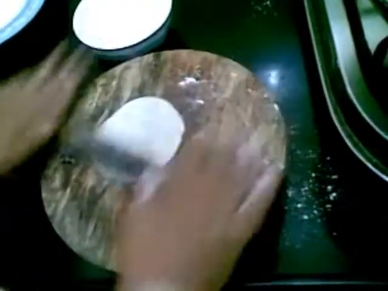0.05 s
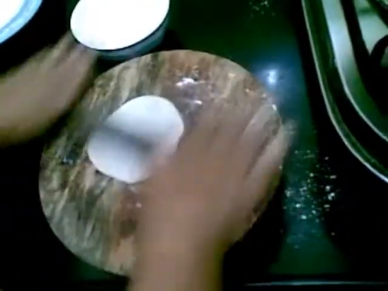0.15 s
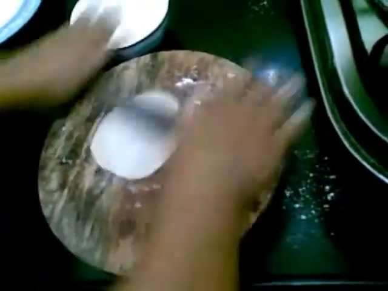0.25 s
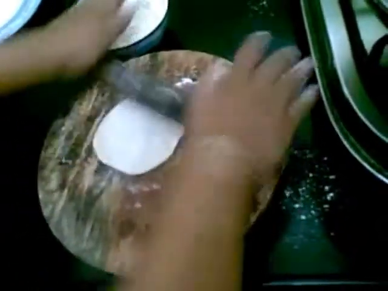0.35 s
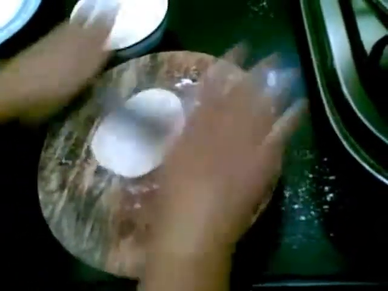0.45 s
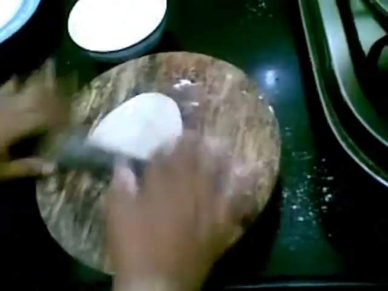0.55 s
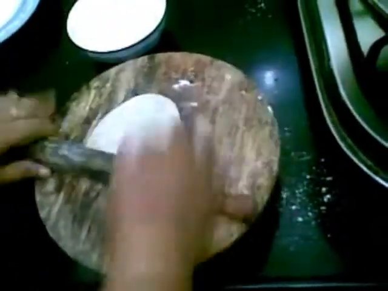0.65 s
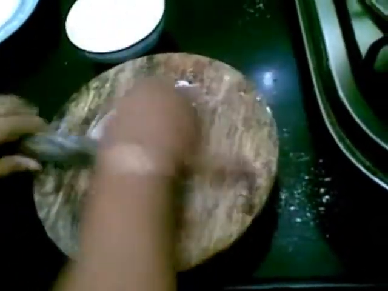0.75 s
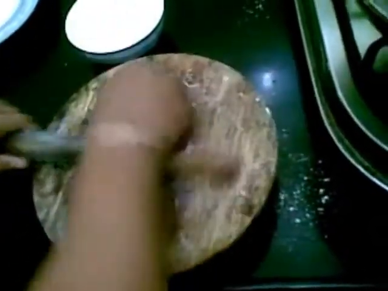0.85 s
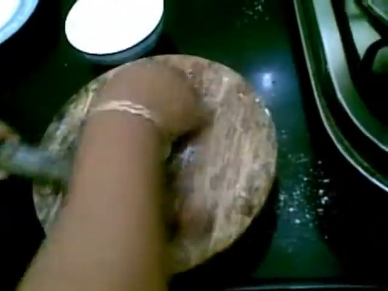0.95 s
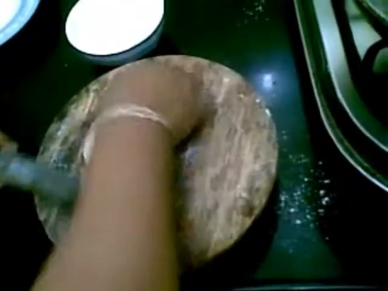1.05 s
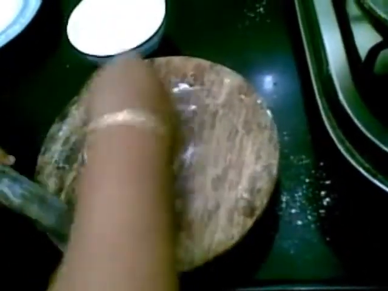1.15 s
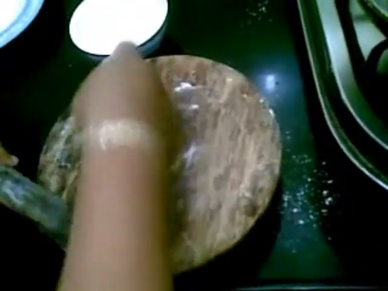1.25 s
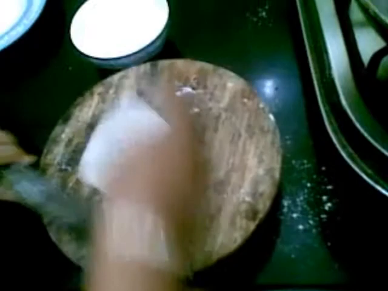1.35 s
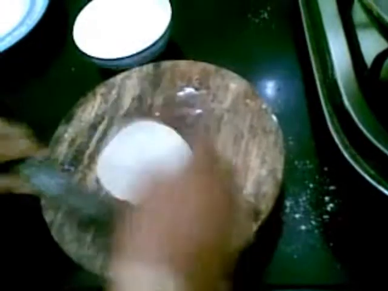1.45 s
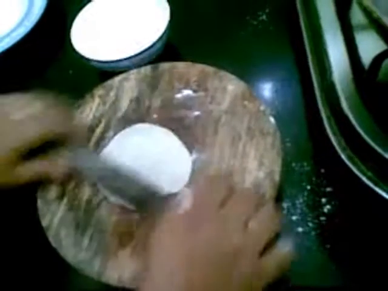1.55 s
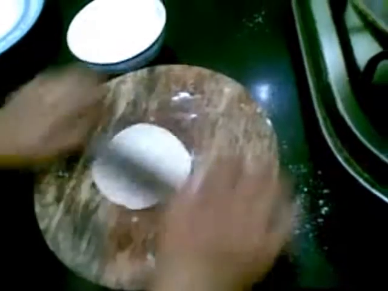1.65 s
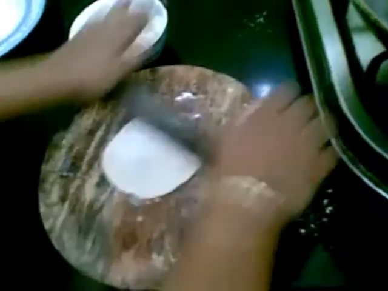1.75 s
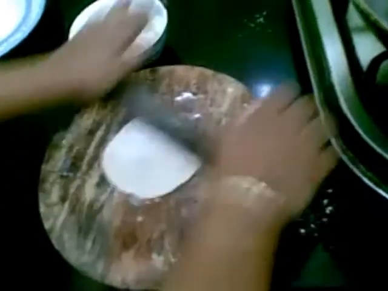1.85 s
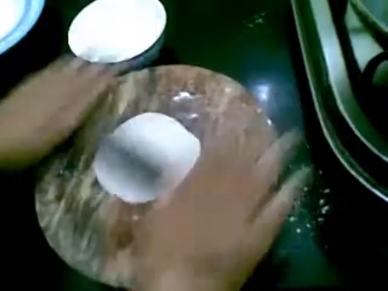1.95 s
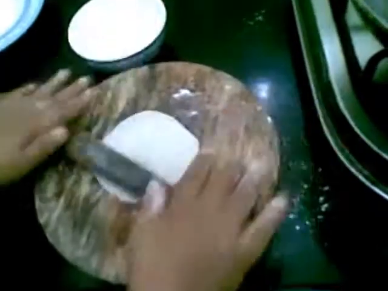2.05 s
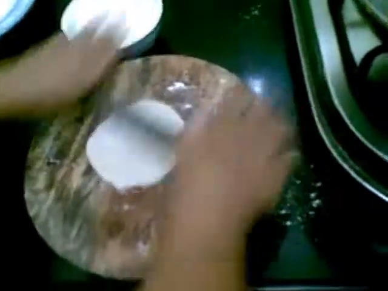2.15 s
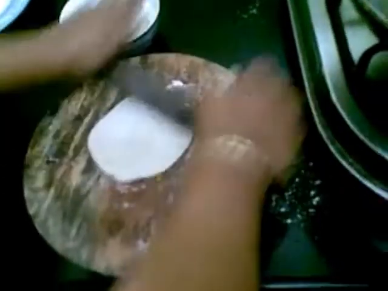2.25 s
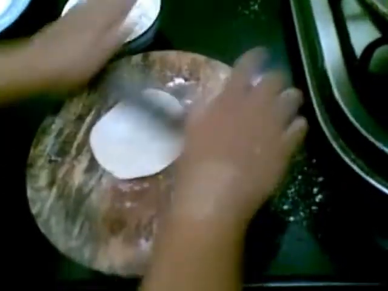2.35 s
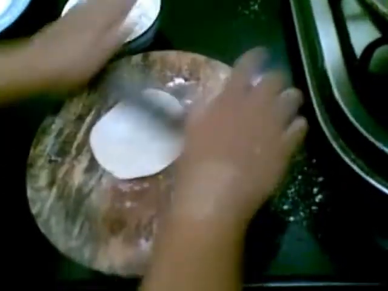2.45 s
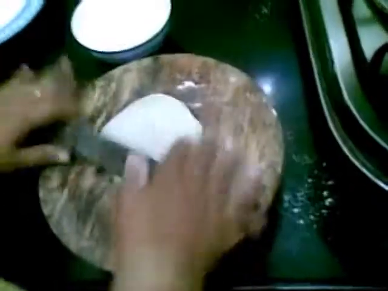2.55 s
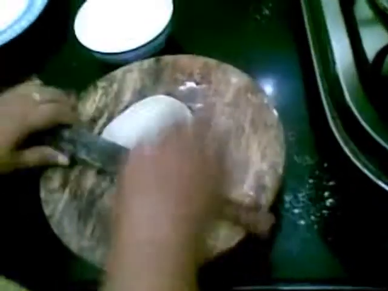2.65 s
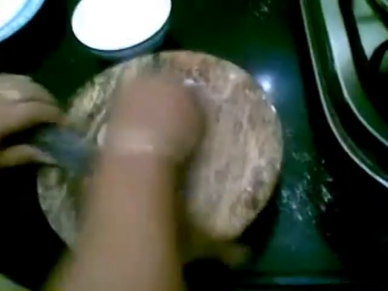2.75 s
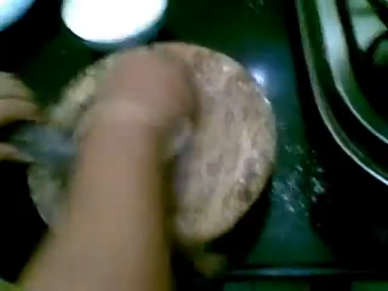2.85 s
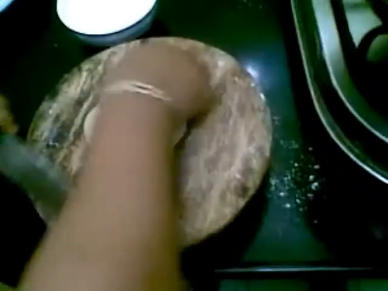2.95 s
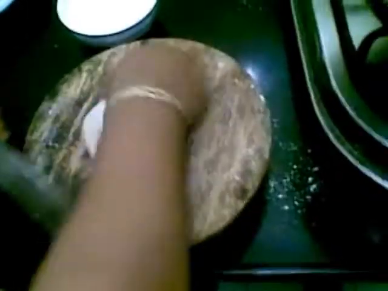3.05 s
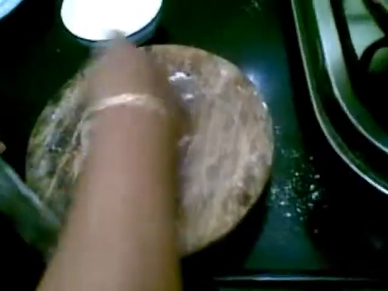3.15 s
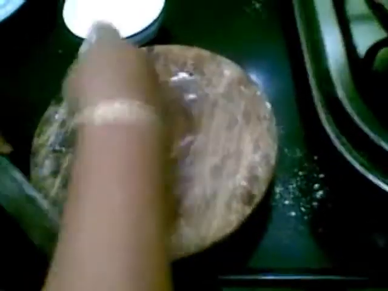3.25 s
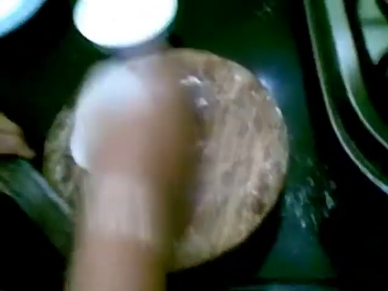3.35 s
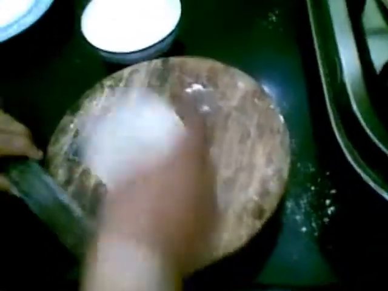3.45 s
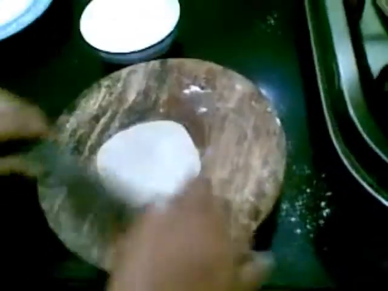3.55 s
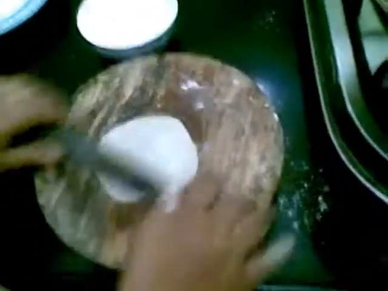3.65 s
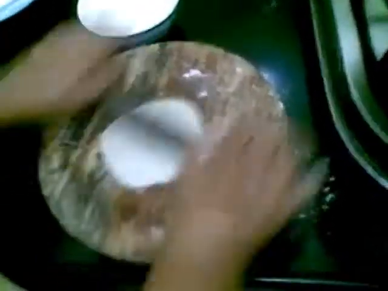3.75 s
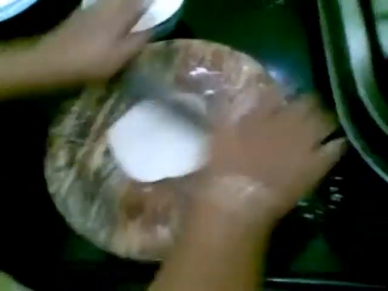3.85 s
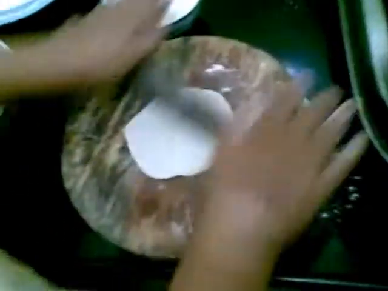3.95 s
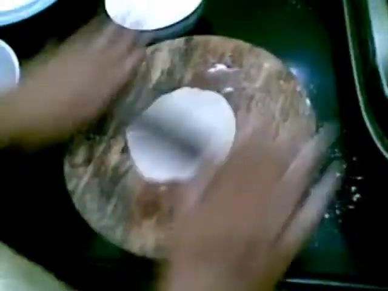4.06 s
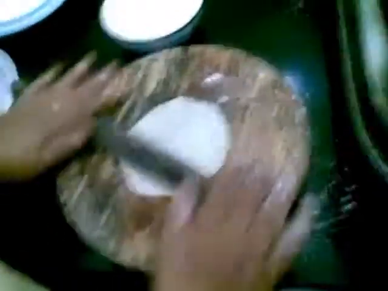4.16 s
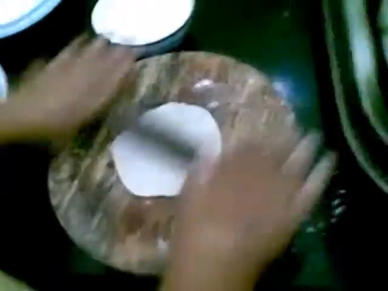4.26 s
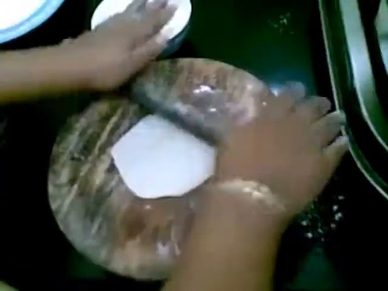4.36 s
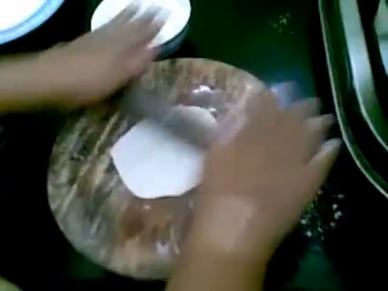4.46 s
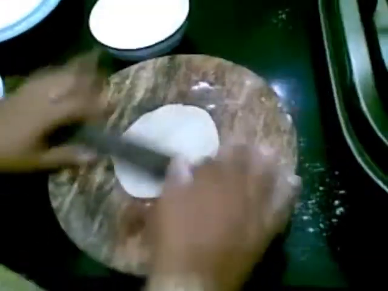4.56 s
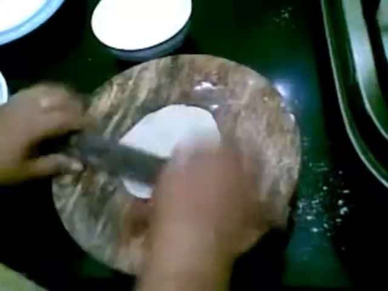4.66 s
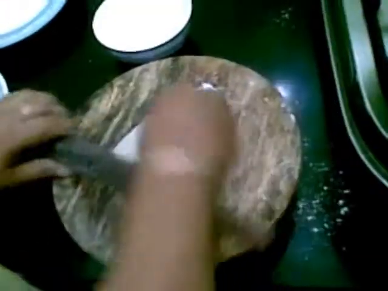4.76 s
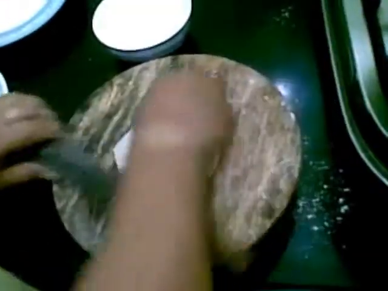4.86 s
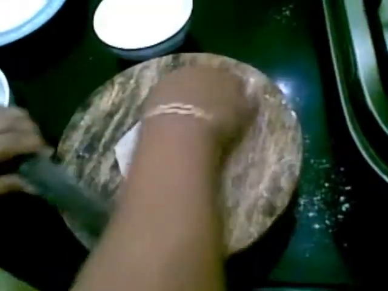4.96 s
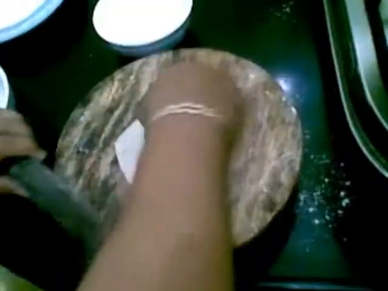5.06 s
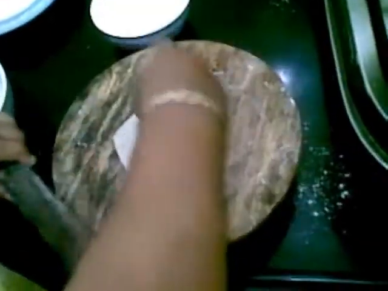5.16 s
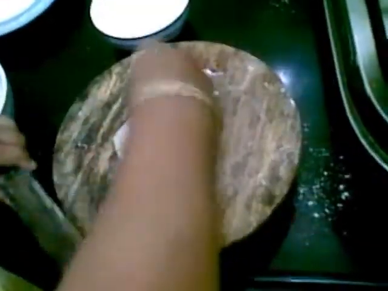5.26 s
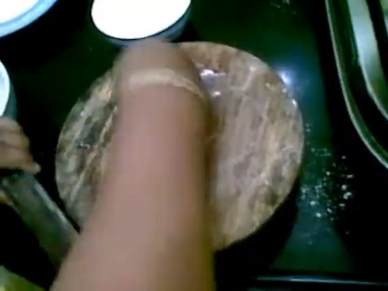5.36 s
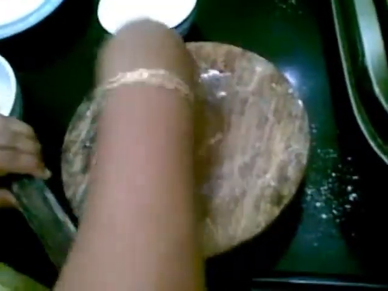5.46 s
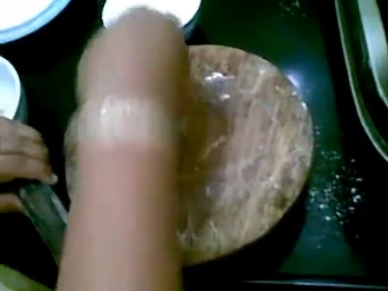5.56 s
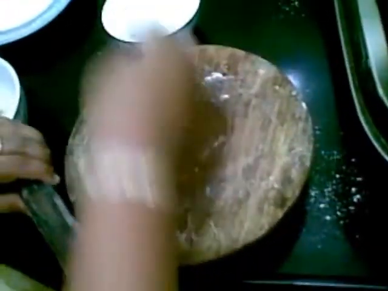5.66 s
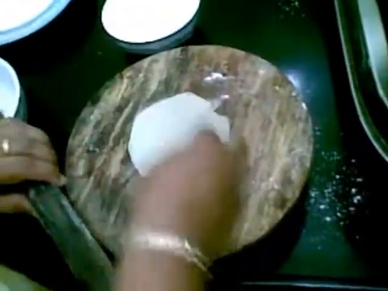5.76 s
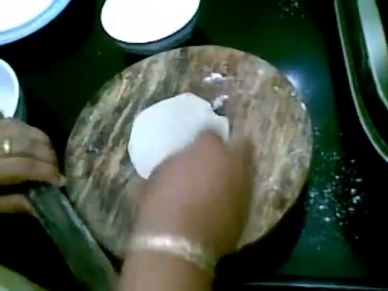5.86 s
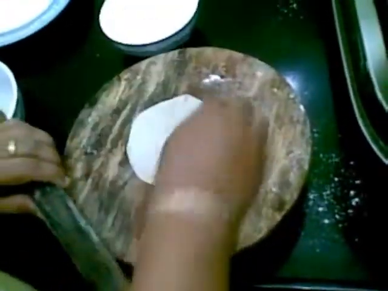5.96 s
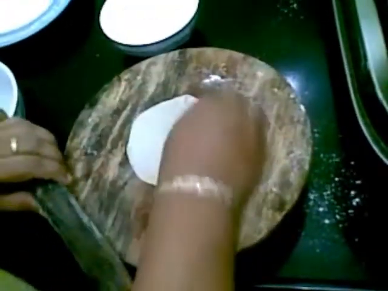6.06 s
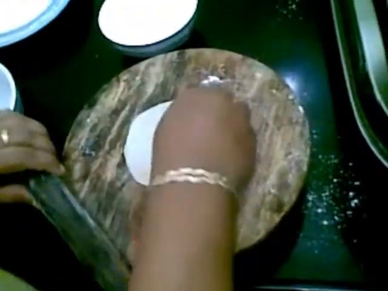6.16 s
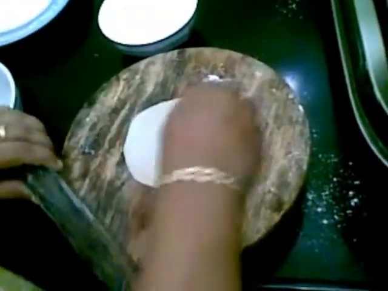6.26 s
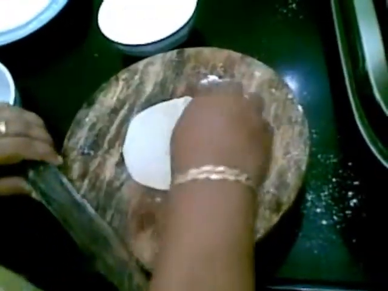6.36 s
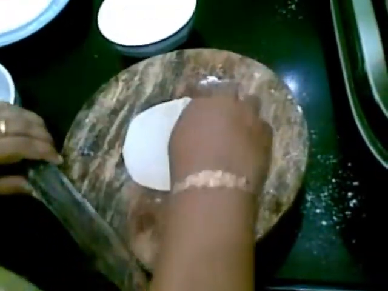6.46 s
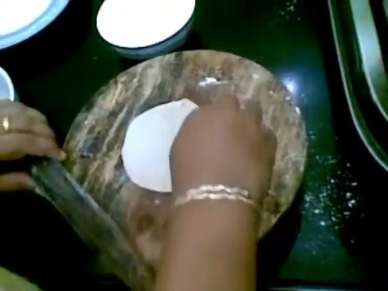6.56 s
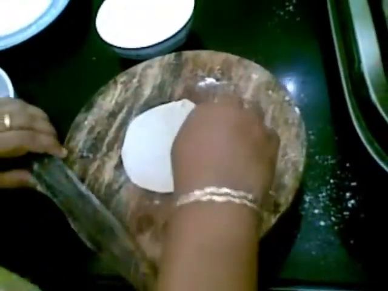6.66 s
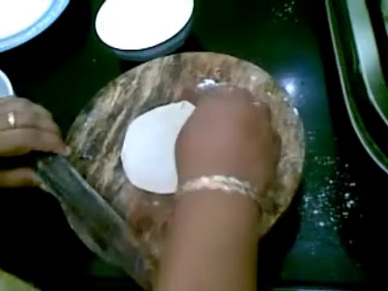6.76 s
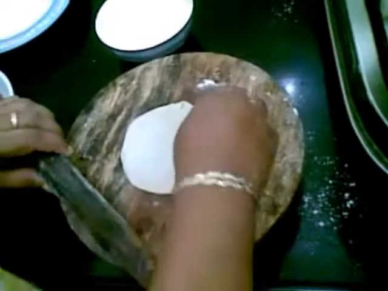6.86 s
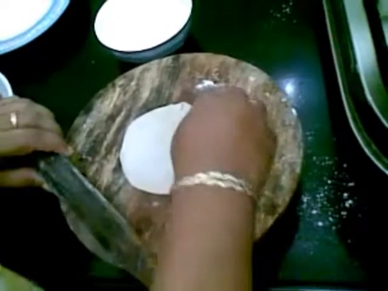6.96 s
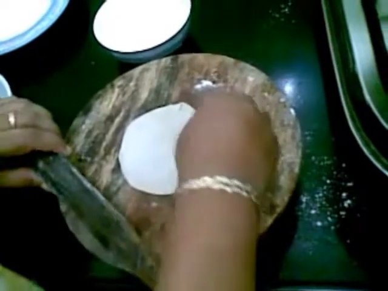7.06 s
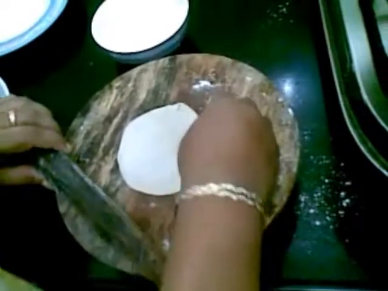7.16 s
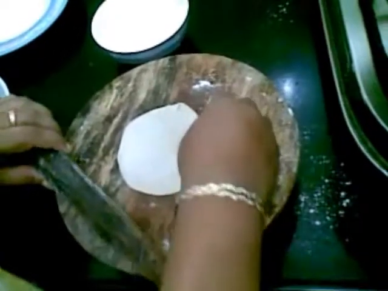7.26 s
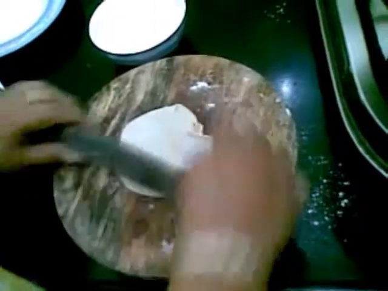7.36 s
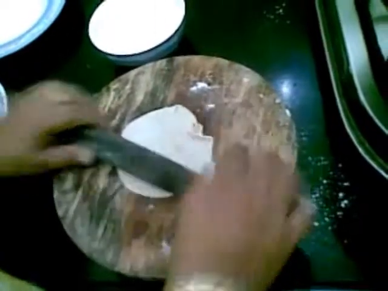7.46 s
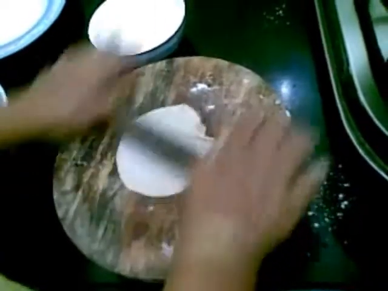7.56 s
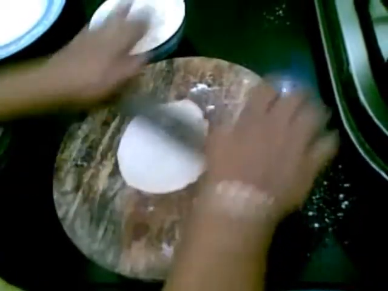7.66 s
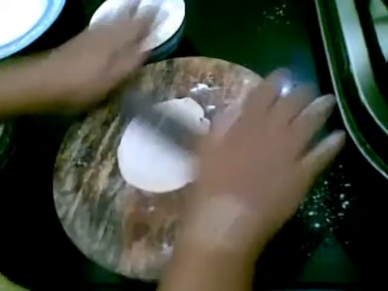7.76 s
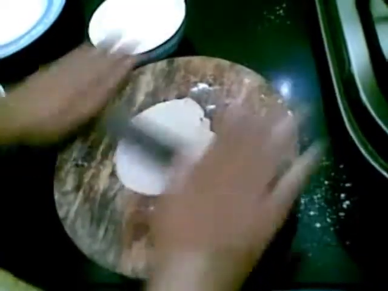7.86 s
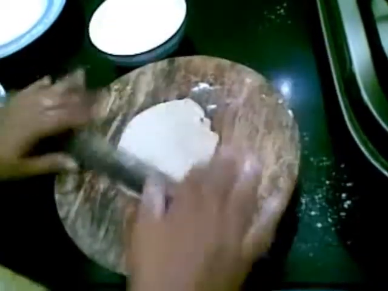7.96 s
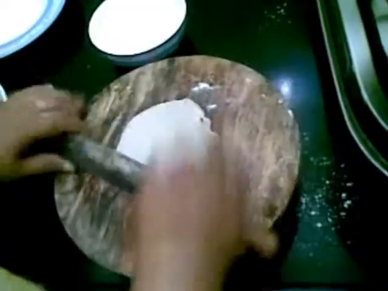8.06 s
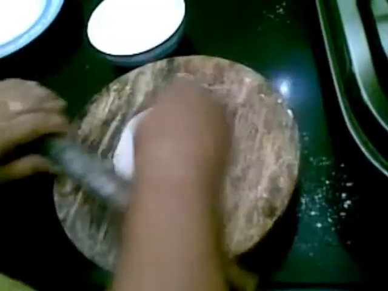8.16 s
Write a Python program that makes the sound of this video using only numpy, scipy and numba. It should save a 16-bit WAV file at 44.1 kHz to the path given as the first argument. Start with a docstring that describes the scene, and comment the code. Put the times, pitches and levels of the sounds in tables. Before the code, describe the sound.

A rolling pin rumbles softly over dough on a wooden board in a small, hard kitchen. The board rocks and knocks on the stone counter at uneven intervals, loudest twice in the first half, and the pin clacks dryly on its rim. A finger ring clicks against the pin, a bracelet jingles lightly and a hand swishes through flour. It all sounds close, over a steady hiss and faint hum.

```python
"""A pin rolls out flatbread on a round wooden board, which rocks and knocks on a stone kitchen counter.
The pin rumbles on the dough and clacks on the board's rim, and a finger ring clicks against it.
A bracelet's links jingle, and a hand swishes as it turns the dough in flour.
Each blow rings on in a hard little room, over a steady hiss and a faint hum.
An automatic volume control turns everything down after a loud knock, then creeps back up."""
import sys
import numpy as np
from scipy import signal
from scipy.fft import rfft, irfft, next_fast_len
from scipy.io import wavfile
from scipy.ndimage import uniform_filter1d
from numba import njit

SR = 44100
rng = np.random.default_rng(int(sys.argv[2]) if len(sys.argv) > 2 else 0)


def unload_audio(sound):
    """Save the sound as a 16-bit wav file, at the path given as the first command line argument."""
    columns = np.transpose(np.atleast_2d(sound))
    # keep every value between -1 and 1, then stretch to whole-number steps
    steps = np.round(np.clip(columns, -1, 1) * 32767)
    wavfile.write(sys.argv[1], SR, steps.astype(np.int16))


N = 362061
NOW = np.arange(N) / SR  # time in the scene [s]
AGE = np.arange(SR * 3 // 5) / SR  # time since a blow [s]


def undb(db):
    """Turn decibels into a factor to multiply by."""
    return 10 ** (np.asarray(db) / 20)


def unit(x):
    """Scale a sound so its average strength (rms) is 1."""
    return x / np.std(x)


def peak(x):
    """Scale a sound so its highest peak is 1."""
    return x / np.abs(x).max()


def fade(t60):
    """A dying curve that loses 60 dB in t60 seconds, the fade time."""
    return np.exp(-np.log(1000) * AGE / t60)


def bell(hz, centre_hz, octaves):
    """A hill-shaped weight that favours pitches near the centre."""
    return np.exp(-.5 * (np.log2(hz / centre_hz) / octaves) ** 2)


def colour(spectrum, size):
    """Join (Hz, dB) points into a weight for each frequency of a sound `size` samples long."""
    hz, db = np.transpose(spectrum)
    f = np.fft.rfftfreq(size, 1 / SR) + 1
    return undb(np.interp(np.log(f), np.log(hz), db))


def band(centre_hz, octaves, size):
    """Noise of strength 1, gathered around one pitch."""
    padded = next_fast_len(size)
    f = np.fft.rfftfreq(padded, 1 / SR) + 1
    white = rfft(rng.standard_normal(padded))
    return unit(irfft(white * bell(f, centre_hz, octaves), padded)[:size])


def walk(rate):
    """A wandering curve that heads for a new random value `rate` times a second."""
    knots = rng.standard_normal(int(N / SR * rate) + 2)
    return np.interp(NOW * rate, np.arange(len(knots)), knots)


def even(x, bins):
    """A sound's spectrum, levelled out by averaging over `bins` neighbouring frequencies."""
    spectrum = rfft(x)
    return spectrum / np.sqrt(uniform_filter1d(np.abs(spectrum) ** 2, bins))


def burst(spectrum, t60):
    """A short crack with no pitch, coloured by (Hz, dB) points."""
    flat = even(rng.standard_normal(len(AGE)) * fade(t60), bins=60)
    return peak(irfft(flat * colour(spectrum, len(AGE)), len(AGE)) * fade(10 * t60))


def snap(centre_hz, octaves):
    """One hard touch: a pulse about a millisecond long."""
    edges_hz = np.minimum(centre_hz * 2 ** (np.array([-1, 1]) * octaves), SR / 3)
    band_pass = signal.butter(3, edges_hz, "band", fs=SR, output="sos")
    return peak(signal.sosfilt(band_pass, signal.unit_impulse(len(AGE))))


def ring(tones, weight=lambda hz: 1):
    """A struck thing rings with its own fading tones; neighbours swing in opposite directions."""
    return peak(sum((-1) ** k * undb(db) * weight(hz) * fade(t60) * np.sin(2 * np.pi * hz * AGE)
                    for k, (hz, db, t60) in enumerate(tones)))


def contact(x, bright_hz):
    """A softer touch lasts longer and leaves the treble out."""
    return signal.sosfilt(signal.butter(3, min(bright_hz, SR / 3), fs=SR, output="sos"), x)


def add(track, s, sound):
    """Mix a sound into a track, starting at s seconds."""
    start = max(int(s * SR), 0)
    part = sound[:max(N - start, 0)]
    track[start:start + len(part)] += part


def kitchen(hiss_hz=3280, sink_hz_per_s=85, hiss_db=-53, grow_db_per_s=0.76):
    """Steady room noise, a deep rumble and a thin hiss that sinks in pitch and grows a little."""
    # colour of the room noise: (frequency [Hz], relative level [dB])
    air_spectrum = [(20, -8), (75, -14), (150, -13.5), (290, -12.5), (400, -16), (540, -15.5), (720, -19),
                    (1000, -19), (1500, -22.5), (2700, -18), (3500, -20), (6400, -38.5), (8800, -36),
                    (10000, -68.5)]
    # swells of the rumble: (time [s], level [dB])
    rumble_levels = [(0, -63), (1.3, -44.5), (1.55, -54), (2.6, -53), (3.15, -46), (3.5, -56), (4.5, -56),
                     (5.6, -64), (5.85, -43), (6.2, -56), (6.5, -46), (7.05, -44.5), (7.45, -36),
                     (7.88, -42.5), (8.2, -45)]
    # slow noise riding on a high tone makes a narrow hiss
    slow = signal.sosfilt(signal.butter(2, 270, fs=SR, output="sos"), rng.standard_normal((2, N)))
    phase = 2 * np.pi * np.cumsum(hiss_hz - sink_hz_per_s * NOW) / SR
    narrow = unit(slow[0] * np.cos(phase) + slow[1] * np.sin(phase))
    hiss = undb(hiss_db + grow_db_per_s * NOW + 0.9 * walk(9.5)) * narrow
    rumble_db = np.interp(NOW, *np.transpose(rumble_levels)) - 4.5 * walk(1.1)
    rumble = undb(rumble_db) * band(centre_hz=15, octaves=0.99, size=N)
    air_db = -41 + .5 * walk(11)
    air = unit(irfft(rfft(rng.standard_normal(N)) * colour(air_spectrum, N), N))
    return undb(air_db) * air + hiss + rumble


def hum(drift_hz=1.513, waver_db=2):
    """Faint wavering tones, like a motor running in the kitchen."""
    # tones of the hum: (pitch [Hz], level [dB])
    tones = [(97, -61.5), (156.1, -56.5), (199.2, -59), (247.6, -56), (296.1, -55.5), (538.3, -57.5),
             (969, -62.5)]
    track = np.zeros(N)
    for hz, db in tones:
        height = np.sqrt(2) * undb(db + waver_db * walk(3.3))
        phase = 2 * np.pi * np.cumsum(hz + drift_hz * walk(4)) / SR
        track += height * np.sin(phase)
    return track


def room(x, build_s=0.00049):
    """Hard walls close by return a dense tail of echoes that lasts longest in the bass."""
    # how long the room rings: (frequency [Hz], fade time [s])
    fade_times = [(100, 0.49), (260, 0.51), (700, 0.43), (1840, 0.37), (4850, 0.42), (9000, 0.28)]
    hz, t60s = np.transpose(fade_times)
    log_f = np.log(np.fft.rfftfreq(len(AGE), 1 / SR) + 1)
    white = rfft(rng.standard_normal(len(AGE)))
    # split the noise into bands and let each fade at its own speed
    bands = [irfft(white * np.interp(log_f, np.log(hz), share), len(AGE)) for share in np.eye(len(hz))]
    tail = sum(part * fade(t60) for part, t60 in zip(bands, t60s))
    tail = irfft(even(tail, bins=24), len(AGE))
    build_up = 1 - np.exp(-(AGE / build_s) ** 2)
    tail = (tail * build_up)[:len(AGE) * 3 // 4]
    return signal.fftconvolve(x, tail / np.linalg.norm(tail))[:N]


def hand_swishes(grain_db=2.5):
    """Hand and pin brush over flour, dough and wood in grainy swells of noise."""
    # swishes: (peak time [s], level [dB], rise [s], fall [s], centre [Hz], width [octaves])
    swishes = [(0.581, -52.5, 0.22, 0.17, 4700, 0.5), (0.862, -33.5, 0.012, 0.041, 2490, 0.67),
               (0.923, -43.5, 0.058, 0.11, 3000, 0.54), (1.25, -48, 0.31, 0.43, 218, 1.9),
               (1.368, -42, 0.059, 0.028, 6460, 0.26), (3.328, -46.5, 0.26, 0.35, 585, 0.48),
               (3.406, -50, 0.39, .4, 4200, 0.62), (3.605, -35, 0.013, .03, 5100, 0.27),
               (3.918, -46.5, 0.14, 0.12, 4140, 0.44), (5.151, -47, 0.025, 0.059, 6260, 0.28),
               (5.18, -43, 0.07, 0.07, 2010, 1.0), (6.082, -42.5, 0.035, 0.04, 1980, 0.57),
               (6.352, -43.5, 0.02, 0.082, 3940, 0.41), (6.439, -42, 0.1, .1, 2840, 0.19),
               (6.602, -45, 0.23, 0.12, 249, 1.3), (7.42, -50, 0.16, 0.32, 90, 0.64)]
    track = np.zeros(N)
    grain = undb(grain_db * walk(250))
    for s, db, rise_s, fall_s, centre_hz, octaves in swishes:
        progress = (NOW - s) / np.where(NOW < s, rise_s, fall_s)
        near = np.abs(progress) < 3
        swell = np.exp(-progress[near] ** 2)
        track[near] += undb(db) * swell * grain[near] * band(centre_hz, octaves, len(swell))
    return track


def bracelet_jingles(touches=11, detune=0.02185, scatter_db=4, settle_s=0.068, room_db=-4):
    """Each shake makes small links touch, every one with a tick and a tuning of its own."""
    # shakes of the bracelet: (time [s], level [dB], swell time [s], centre [Hz])
    shakes = [(.002, -39.5, 0.00084, 7900), (0.40, -35.5, 0.049, 7600), (0.856, -27.5, 0.0011, 8450),
              (1.885, -34.5, 0.024, 7600), (2.291, -32, 0.04, 7400), (2.852, -24.5, 0.00073, 8700),
              (3.937, -33.5, 0.02, 8300), (4.411, -26.5, 0.00095, 9300), (4.838, -29.5, 0.028, 8500),
              (6.165, -42, 0.019, 8200), (6.458, -43.5, 0.017, 8500), (7.342, -48, 0.034, 8600),
              (7.73, -37, 0.016, 8400)]
    # tones of a link: (pitch [Hz], relative level [dB], fade time [s])
    link_tones = [(5740, -4, 0.05), (7460, 5, 0.11), (7640, 6, 0.038), (9230, 2.5, 0.15),
                  (9260, 2.5, 0.082)]
    track = np.zeros(N)
    for s, db, swell_s, centre_hz in shakes:
        tick = undb(-2) * band(centre_hz, 0.16, len(AGE)) * fade(0.0071)
        fall_s = 0.0028 + 0.26 * swell_s  # a slow shake also dies slowly
        for k in range(touches):
            link = [(hz * (1 + detune * rng.standard_normal()),
                     tone_db + scatter_db * rng.standard_normal(), t60)
                    for hz, tone_db, t60 in link_tones]
            touch = ring(link, lambda hz: bell(hz, centre_hz, octaves=0.35)) + tick
            delay_s = (swell_s + settle_s) * (k + rng.random() * (k > 0)) / touches
            force = np.exp(-abs(delay_s - swell_s) / fall_s)
            add(track, s + delay_s, undb(db) * force * touch)
    return track + undb(room_db) * room(track)


def finger_ring_clicks(upper_hz=3350, room_db=-11):
    """The finger ring strikes the pin with a thin metal tick and bounces once."""
    # strikes: (time [s], level [dB], brightness [Hz], gap to the bounce [s],
    # bounce compared with the strike [dB], change to the upper tones [dB])
    strikes = [(0.154, -5.5, 9000, .0011, -41, 1.5), (2.119, -4, 3740, .0029, -3.5, 1.5),
               (2.609, -5, 3600, 0.0047, -3, 0.5), (4.178, -18.5, 2000, 0.00186, -9, -5),
               (4.286, -30, 2100, .0018, 8, 0)]
    # tones of the pin: (pitch [Hz], relative level [dB], fade time [s])
    pin_tones = [(1464, -14.5, 0.03), (2660, 7, 0.016), (2810, 12, 0.007), (3260, 2.5, 0.0084),
                 (3620, -4.5, 0.018), (4010, -1.5, 0.015), (7000, -38, 0.0082), (7460, -42, 0.014)]
    track = np.zeros(N)
    for s, db, bright_hz, gap_s, bounce_db, upper_db in strikes:
        tick = undb(-30) * band(6860, 0.25, len(AGE)) * fade(0.019)
        # the palm muffles the upper tones more on some strikes than on others
        pin = ring(pin_tones, lambda hz: undb(upper_db * (hz > upper_hz)))
        click = undb(db) * (peak(contact(pin, bright_hz)) + tick)
        add(track, s, click)
        add(track, s + gap_s, undb(bounce_db) * click)
    return track + undb(room_db) * room(track)


def pin_rolling(stroke_s=0.55, first_push_s=0.23, swing_db=5.5, lean_s=0.041, bump_db=3):
    """The pin rumbles softly and unevenly over the dough, loudest in each push."""
    # spells of rolling: (start [s], end [s], level [dB])
    rolls = [(-.1, 1.114, -46), (2.605, 2.903, -53), (4.552, 5.0, -52), (7.567, 7.96, -62)]
    effort = np.zeros(N)
    for start, end, db in rolls:
        lean = np.clip(np.minimum(NOW - start, end - NOW) / lean_s, 0, 1)  # press on, then let go
        stroke = np.cos(2 * np.pi * (NOW - start - first_push_s) / stroke_s)  # push and return
        effort += lean * undb(db + swing_db * stroke)
    return effort * undb(bump_db * walk(35)) * band(centre_hz=293, octaves=1, size=N)


def pin_clacks(grip_t60=0.035, scrape_db=-20, room_db=-11.5):
    """The pin hits the rim: a dry snap, ringing cut short by the hand, and a scrape as it slips."""
    # hits: (time [s], level [dB], centre for the spot struck [Hz], ringing compared with the snap [dB])
    hits = [(.578, -25, 2050, -9), (1.539, -20, 2700, -13), (1.5491, -12, 2250, -1),
            (3.5898, -11.5, 2070, -2), (3.5921, -6.5, 2520, -6.5), (3.6072, -8.5, 3560, -25),
            (5.8721, -17, 2650, -3), (5.8737, -4.5, 2530, -11), (5.876, -19, 2500, 10),
            (7.564, -17.5, 2390, 1), (8.03, -16, 2350, -4)]
    # tones of the board's rim: (pitch [Hz], relative level [dB], fade time [s])
    rim_tones = [(1435, 7, 0.015), (1890, -10.5, 0.007), (2420, 3.5, 0.015), (2513, 16, 0.0049),
                 (2630, 12.5, 0.0064), (3030, -0.5, 0.027), (3650, -19, 0.0044), (4150, -13.5, 0.016),
                 (6500, -9, 0.012)]
    track = np.zeros(N)
    for s, db, centre_hz, ring_db in hits:
        rim = undb(ring_db) * ring(rim_tones, lambda hz: bell(hz, centre_hz, octaves=0.2))
        clack = peak(snap(centre_hz, octaves=0.37) + rim * fade(grip_t60))
        scrape = undb(scrape_db) * band(0.95 * centre_hz, 0.4, len(AGE)) * fade(0.15)
        add(track, s, undb(db) * (clack + scrape))
    return track + undb(room_db) * room(track)


def board_knocks(rise_s=0.0038, hands_t60=0.99, echo_s=0.03, echo_db=-1):
    """The rocking board's edge drops: the wood rings, the blow cracks and the counter booms under it."""
    # knocks, and at 4.765 s and 7.59 s the wall's late answer to the knock just before: (time [s], level [dB],
    # brightness [Hz], relative wood ringing [dB], relative boom [dB], boom centre [Hz], boom width [octaves],
    # relative room sound [dB])
    knocks = [(0.6247, -23.5, 1900, -20, -5, 380, 0.37, -7), (0.855, -26.5, 5100, -3, 0, 470, 0.16, 8.5),
              (1.55, -23, 2470, -7, -12, 423, 0.42, 1), (1.702, -1, 7500, -6.5, -14.5, 336, 0.54, 4.5),
              (1.708, 1, 5370, -20, -6.5, 670, 0.39, 2.5), (1.715, -8, 5940, -15, -11, 640, 0.65, -6),
              (1.721, -12, 6500, -13, -24, 600, .5, 3), (1.7505, -15, 4500, -4, -8, 705, 0.3, -8),
              (1.7772, -18, 3800, -12.5, -12, 640, 0.42, -6), (2.627, -21, 1540, -16, -8, 415, 0.67, -9),
              (2.733, -33, 900, -10, -6, 447, 0.21, -15), (2.8445, -14, 3220, -1.5, -10.5, 340, 0.4, -2),
              (3.773, 1.5, 3600, 3, -17.5, 476, 0.94, 1.5), (4.671, -30.5, 750, -14, -5.5, 380, 0.42, -15),
              (4.7339, -16, 2500, -4, -7, 390, 0.36, -2), (4.765, -26, 800, -11, -7, 398, .35, -2),
              (4.8233, -12, 3300, -13, -8, 350, 0.34, -10), (4.8302, -17.5, 2620, 4, -20, 400, 0.37, 5.5),
              (7.5618, -16.5, 1000, -22, -1, 272, 0.49, -7), (7.59, -25.5, 600, -8, -5, 356, 0.22, -16),
              (8.0286, -16, 1840, -12, -14, 330, 0.46, -6.5)]
    # tones of the board and of the counter: (pitch [Hz], relative level [dB], fade time [s])
    board_tones = [(670, -10, 0.09), (1217, -9.5, 0.096), (1294, -2.5, 0.04), (1455, 2.5, 0.033),
                   (1530, -14, 0.0079), (1860, -11, 0.023), (2080, 2, 0.006), (2640, -1.5, 0.009),
                   (3170, -11, 0.054), (3365, -16, 0.08), (3570, 0, 0.01), (4430, -9, 0.0091)]
    counter_tones = [(126.5, 9.5, 0.56), (157, -13, 0.29), (210.8, -1, 0.64), (237.3, -6.5, 0.73),
                     (282.5, 0.5, 0.58), (342.4, 0.5, 0.21), (349.2, 2.5, 0.84), (450, 7.5, 0.1),
                     (464.4, 1.5, 0.21), (546, -8, 0.26), (588, -4.5, 0.32), (659, 0, 0.21), (684, 1, 0.18),
                     (709, -7, 0.24), (730, -10, 0.41), (765, -1.5, 0.22)]
    # colour of the crack: (frequency [Hz], relative level [dB])
    crack_spectrum = [(110, -12.5), (250, 1), (380, -4.5), (520, 4.5), (720, 4), (930, -11), (1100, -3),
                      (1450, -0.5), (1750, -2), (2800, 0.5), (4000, -6.5), (4800, -15), (6000, -18.5),
                      (6900, -65), (10000, -67)]
    # the heavy counter takes a moment to swing; the hands' weight on the board shortens the boom
    boom_shape = (1 - np.exp(-AGE / rise_s)) * fade(hands_t60)
    track = np.zeros(N)
    for s, db, bright_hz, ring_db, boom_db, boom_hz, octaves, room_db in knocks:
        wood = contact(undb(ring_db) * ring(board_tones), bright_hz)
        crack = contact(undb(-3) * burst(crack_spectrum, t60=0.026), bright_hz)
        force = undb(db) / np.abs(wood + crack).max()
        counter = ring(counter_tones, lambda hz: bell(hz, boom_hz, octaves))
        boom = undb(db + boom_db) * counter * boom_shape
        add(track, s, force * (wood + crack) + boom)
        add(track, s + echo_s, undb(echo_db) * boom)  # a wall sends the boom back
        # the crack fills the room more than the ringing; each spot on the edge has its own echoes
        spread = force * undb(room_db) * (undb(-10) * wood + undb(3) * crack)
        add(track, s, room(spread + undb(-13) * boom))
    return track


def scene(lowest_hz=85):
    """Mix the blows, the rolling, the hands and the kitchen into one channel."""
    blows = board_knocks() + pin_clacks() + finger_ring_clicks() + bracelet_jingles()
    # the blows, the counter's boom included, carry no deep bass
    bass_cut = signal.butter(3, lowest_hz, "high", fs=SR, output="sos")
    return (signal.sosfilt(bass_cut, blows) + pin_rolling() + hand_swishes() + kitchen() + hum())[None]


@njit
def follow(x, attack, release):
    """Track a sound's level, rising at the attack rate and sinking at the release rate."""
    levels, level = np.empty(len(x)), 0.
    for i in range(len(x)):
        level += (abs(x[i]) - level) * (attack if abs(x[i]) > level else release)
        levels[i] = level
    return levels


def record(dry, attack_s=0.025, release_s=0.59, threshold_db=-29, slope=0.32, ceiling=0.95, top_hz=9800):
    """The volume dips after loud knocks and creeps back; peaks are rounded and the top treble is cut."""
    level = follow(dry[0], 1 / (attack_s * SR), 1 / (release_s * SR))
    gain = np.maximum(level / undb(threshold_db), 1) ** -slope
    rounded = ceiling * np.tanh(dry * gain / ceiling)
    return signal.sosfilt(signal.ellip(10, .2, 65, top_hz, fs=SR, output="sos"), rounded)


dry = scene()
out = record(dry)
unload_audio(out)
```